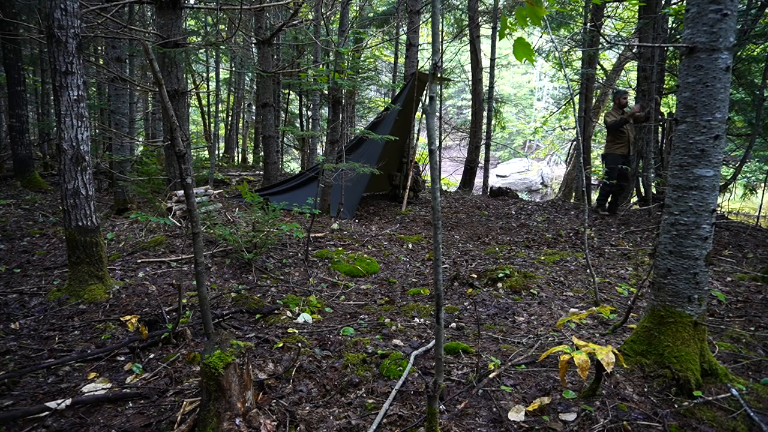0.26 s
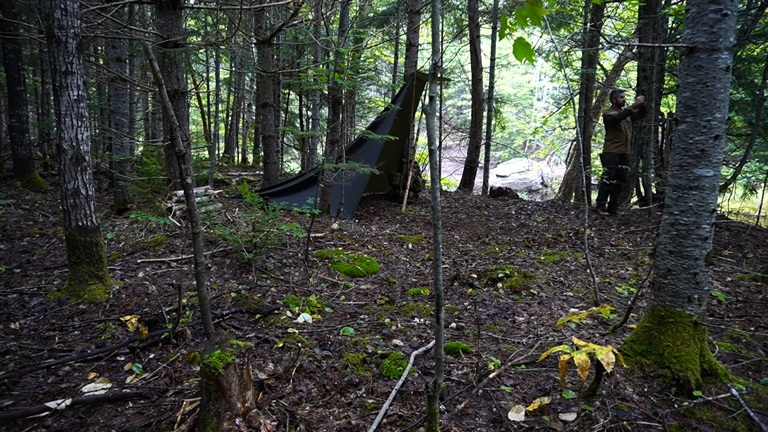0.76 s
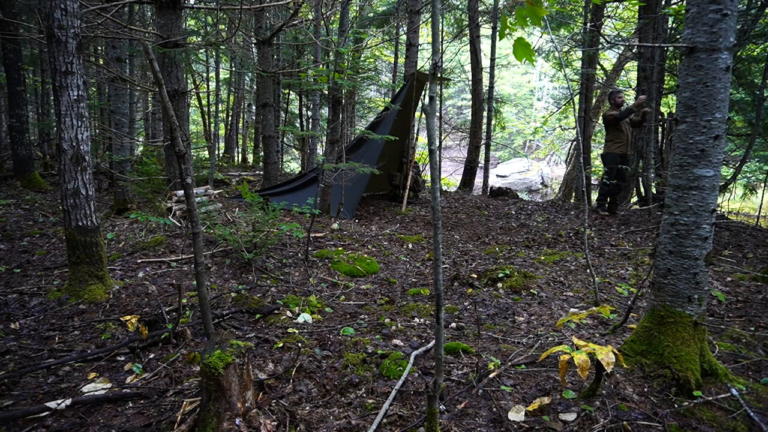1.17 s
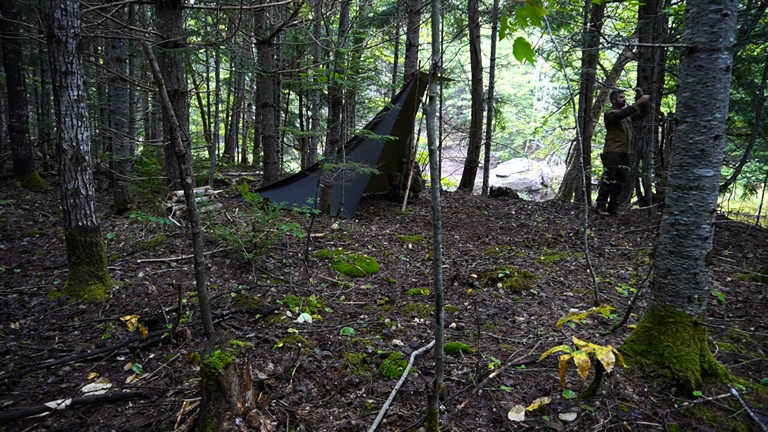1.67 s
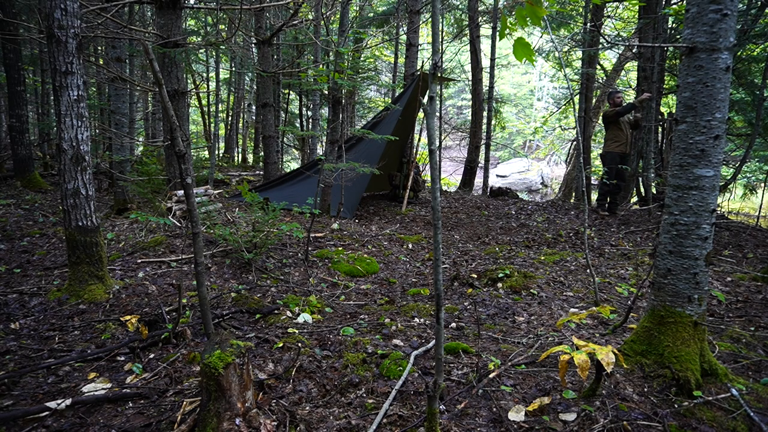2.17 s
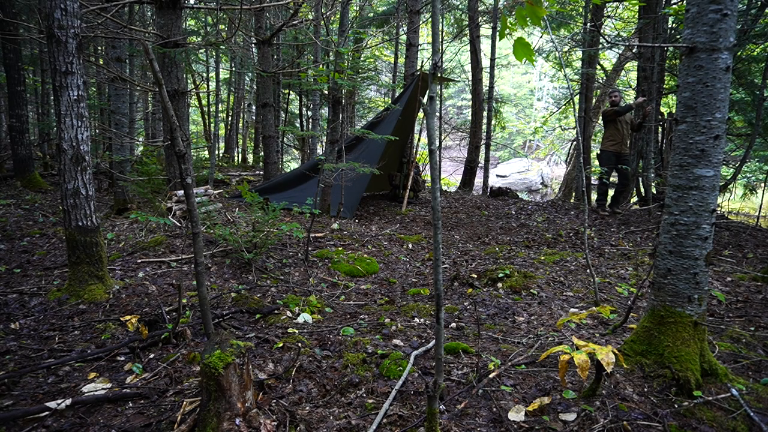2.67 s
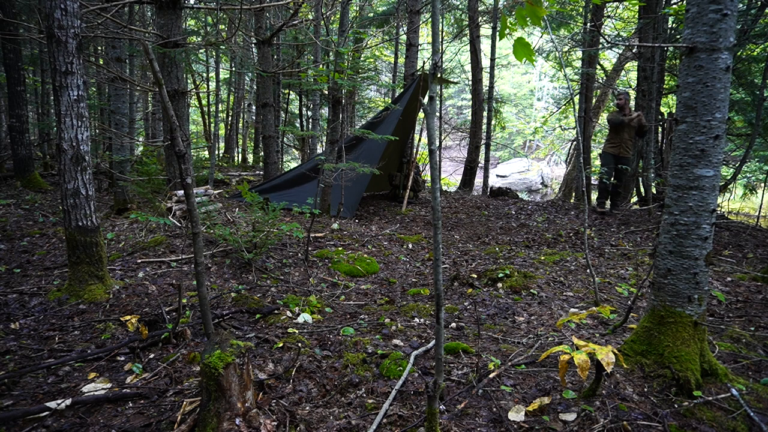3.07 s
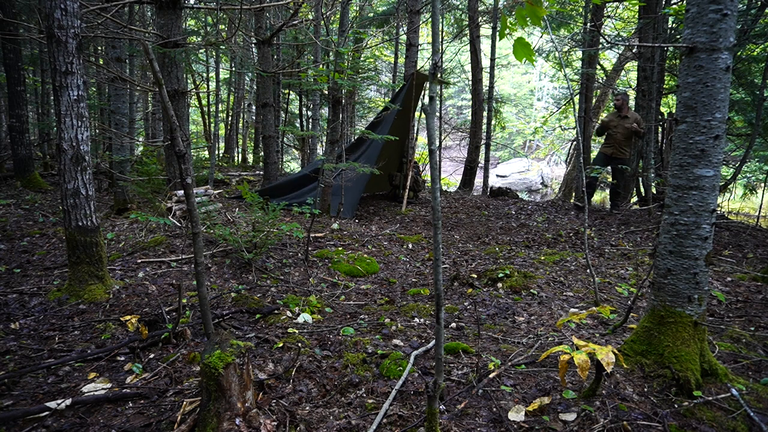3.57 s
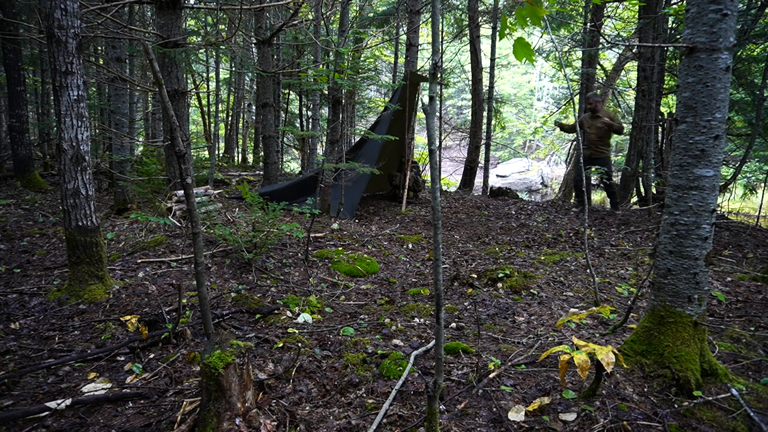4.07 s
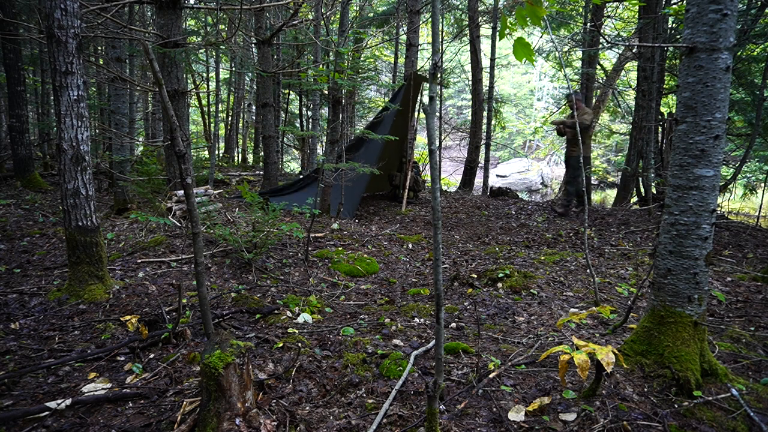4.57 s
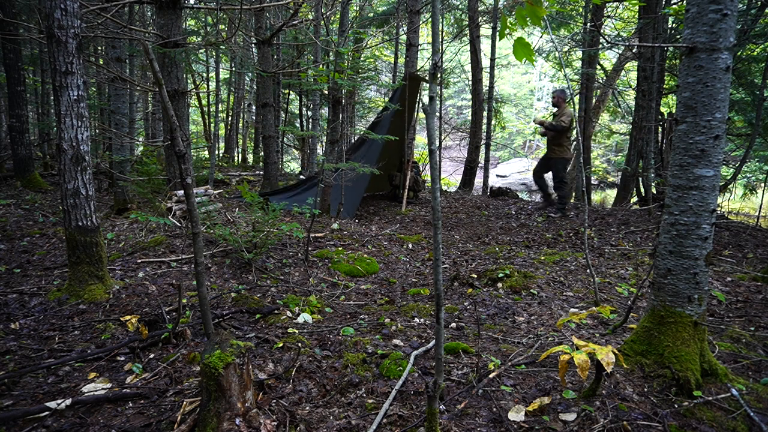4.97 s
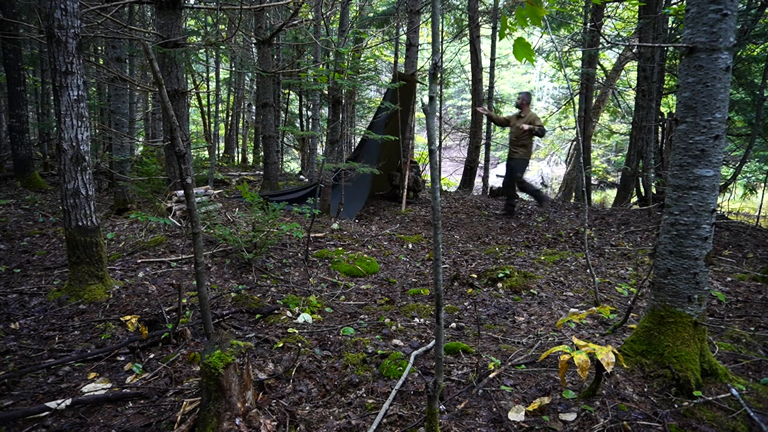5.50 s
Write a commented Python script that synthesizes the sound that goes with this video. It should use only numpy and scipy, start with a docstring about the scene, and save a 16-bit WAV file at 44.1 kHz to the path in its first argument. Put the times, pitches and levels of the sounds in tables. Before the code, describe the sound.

Close to the microphone, a heavy drop slaps a taut sheet almost at once, and another, fuller one follows after two seconds. Small ticks on leaves fill the gaps. A short leafy crackle comes just after the second hit, then a dull low thud, a leaf tap and a lighter drop. Faint steps in wet litter end it. Fine far drips and a soft stream lie behind, in open woodland.

```python
"""Forest camp after rain

Heavy drops thump a taut sheet close by, among a few dull low thuds; others tick on leaves around it. Each hit is
a contact click and a burst of noise, coloured by resonances; on the sheet, decaying modes join in.
A man steps through wet litter some way off: fading clusters of snaps. Behind lie the fine patter of far drips,
made of tiny random impacts, and the faint rush of a stream, made of shaped noise."""
import sys
import numpy as np
from scipy import signal
from scipy.fft import rfft, irfft
from scipy.io import wavfile
from scipy.ndimage import uniform_filter1d

SR = 44100
rng = np.random.default_rng(int(sys.argv[2]) if len(sys.argv) > 2 else 0)


def to_wav(sig):
    """Store sig (one row per channel, or 1-D mono) as 16-bit WAV at the path in sys.argv[1].

    Samples outside -1..1 are clipped; the rate is SR.
    """
    pcm = np.clip(np.atleast_2d(sig), -1, 1) * 32767
    pcm = np.round(pcm).astype(np.int16)
    wavfile.write(sys.argv[1], SR, pcm.T)  # frames by channels


N = 253134  # samples


def undb(db):
    """Decibels to amplitude gain."""
    return 10 ** (np.asarray(db) / 20)


def level(x, db):
    """Set the rms level."""
    return x * undb(db) / np.sqrt(np.mean(x ** 2))


def burst(x, db, span_s=.005):
    """Give a short sound the energy of span_s seconds at this rms level."""
    return x * undb(db) * np.sqrt(span_s * SR / np.sum(x ** 2))


def filt(x, hz, kind, order=2):
    """Causal Butterworth low-, high- or band-pass."""
    return signal.sosfilt(signal.butter(order, hz, kind, fs=SR, output="sos"), x)


def add(out, start_s, x):
    """Mix a sound in at its start time, cut at the end of the scene."""
    i = max(int(start_s * SR), 0)
    out[i:i + len(x)] += x[:max(len(out) - i, 0)]


def walk(rate_hz):
    """Slow random wander: normal knots at this rate, joined by straight lines."""
    knots = rng.standard_normal(256)
    return 1.03 * np.interp(np.arange(N) / SR * rate_hz, np.arange(len(knots)), knots)


def clicks(size, rate_hz, spread_db):
    """Random tiny impacts of either sign, a few much stronger than the rest."""
    chance = rng.random(size)
    sign = rng.choice([-1, 1], size)
    strength = rng.exponential(size=size)
    return (chance < rate_hz / SR) * sign * undb(spread_db * np.minimum(strength, 4))


def causal(gain):
    """Minimum-phase response with this gain, by folding the cepstrum: it rings only after the blow."""
    cepstrum = irfft(np.log(gain))
    cepstrum[1:len(gain) - 1] *= 2
    cepstrum[len(gain):] = 0
    return np.exp(rfft(cepstrum))


def far_drips():
    """Many small drips through the wood, on leaves of different sizes, blurred by the trunks."""
    # Each row: time in seconds, level in dB; interpolated.
    patter = [(0.0, -66.5), (0.25, -71), (0.88, -66.5), (1.18, -70.5), (4.33, -69.5), (4.8, -67.5),
              (5.39, -70), (5.74, -69)]
    out = 0
    t = np.arange(SR // 30) / SR
    for hz, band_db in [(1800, 1.5), (3200, 3.5), (5800, 0), (9500, -5.0)]:
        tail = 0.077 * rng.standard_normal(len(t)) * np.exp(-t / 0.0054)
        scatter = signal.unit_impulse(len(t)) + tail
        drips = signal.fftconvolve(clicks(N, rate_hz=130, spread_db=3.5), scatter)[:N]
        out = out + level(filt(drips, (hz * 0.79, hz * 1.35), "band"), band_db)
    contour_db = np.interp(np.arange(N) / SR, *np.transpose(patter))
    return level(out, 0) * undb(contour_db)


def stream():
    """A distant, even rush of shaped noise whose octave bands flicker a little, partly together."""
    # Each row: frequency in Hz, relative spectral density in dB.
    spectrum = [(12, -13), (20, 4.5), (38, -4), (55, -2.5), (81, -4), (104, -5.5), (168, -7.5), (216, -8),
                (301, -10.5), (337, -10.5), (1030, -9), (1960, -15.5), (6720, -24.5), (14700, -34),
                (16000, -33.5)]
    octave = np.log2(np.maximum(np.fft.rfftfreq(N, 1 / SR), 1))
    hz, density_db = np.transpose(spectrum)
    rush = rfft(rng.standard_normal(N)) * undb(np.interp(octave, np.log2(hz), density_db))
    out = 0
    swell = walk(2.37)  # shared by all bands
    for centre in np.arange(4, 15):  # log2 of Hz
        band = irfft(rush * np.maximum(1 - abs(octave - centre), 0), N)
        out = out + band * undb(0.33 * swell + 0.63 * walk(9.1))
    return level(out, -60)


def splash(slap_db, tick_db, tick_hz, spray_db, mist_db, rebound_ms, rebound_share, tick_width_hz):
    """One sharp contact, then a burst of noise as of droplets; the struck spot adds broad resonances."""
    splatter_ms, slap_share = 0.77, 0.29  # slap pitch as a share of the tick's
    spray_hz, mist_hz = 6250, 9860
    click_db = -21  # bare contact click under the resonances, relative to their mean power
    t = np.arange(2048) / SR
    decay = np.exp(-t * 1000 / splatter_ms) + 0.015 * np.exp(-t / 0.0042)
    droplets = rng.standard_normal(len(t)) * decay
    force = rfft(burst(signal.unit_impulse(len(t)), 0) + burst(droplets, 4.0))
    smooth_power = uniform_filter1d(abs(force) ** 2, size=17)
    force = force * causal(smooth_power ** -.5)  # about equally strong at all pitches
    f = np.fft.rfftfreq(len(t), 1 / SR)
    octave = np.log2(f + 1)
    tick_width_octaves = tick_width_hz / tick_hz / np.log(2)
    power = 0
    for db, hz, width_octaves in [(slap_db, slap_share * tick_hz, .5), (tick_db, tick_hz, tick_width_octaves),
                                  (spray_db, spray_hz, .3), (mist_db, mist_hz, .25)]:
        hump = np.exp(-((octave - np.log2(hz)) / width_octaves) ** 2)
        power = power + undb(db) ** 2 * hump / hump.sum()
    # the struck spot snaps back a moment later: two clicks that cancel at some pitches
    ripple = np.exp(-f / 9000) * np.cos(2 * np.pi * f * rebound_ms / 1000)
    power = power * (1 + rebound_share * ripple)
    click_power = undb(click_db) ** 2 * power.mean() / (1 + (f / 4000) ** 2)
    colour = causal(np.sqrt(power + click_power))
    return burst(irfft(force * colour), 10 * np.log10(power.sum()))


def thump(db, low_hz, soft_hz, contact_ms, echo_share):
    """A blow pushes the sheet into its modes; a soft one spares the high modes, one near the edge the low."""
    # Modes of the sheet. Each row: frequency in Hz, relative level in dB, t60 in seconds.
    sheet_modes = [(37, -7.5, 0.44), (61, 0, 0.18), (91.3, -5, 0.14), (121.4, 3.5, 0.08), (192.6, -4, 0.08),
                   (253, -5, 0.06), (339, 7, 0.035), (378, -8, 0.062), (484, 13, 0.02), (665, 12, 0.015)]
    edge_echo_ms = 4.54
    t = np.arange(SR // 2) / SR
    hz, mode_db, t60_s = np.transpose(sheet_modes)[:, :, None]
    detune, spot = rng.standard_normal((2, len(hz), 1))  # small differences from blow to blow
    modes = undb(mode_db + 0.13 * spot) * np.sin(2 * np.pi * hz * (1 + 0.011 * detune) * t)
    swing = np.sum(modes * np.exp(-np.log(1000) * t / t60_s), axis=0)
    push = np.clip((contact_ms / 1000 - t) * SR, 0, 1)
    push = push * np.exp(-.45 * t * 1000 / contact_ms)  # the force eases during contact
    swing = signal.fftconvolve(swing, push)[:len(t)]  # weakens modes whose period equals the contact
    # the ripple comes back duller from the nearest edge
    returning = np.interp(t - edge_echo_ms / 1000, t, filt(swing, 400, "low", order=1), left=0)
    swing = swing + echo_share * returning
    return burst(filt(filt(swing, soft_hz, "low"), low_hz, "high"), db, span_s=.02)


def sheet_hits():
    """Drops splash and set the sheet swinging; a few dull low thuds, perhaps footfalls or the sheet flapping,
    are played the same way."""
    # Each row: start in seconds, thump level in dB, thump high-pass corner in Hz, softness low-pass corner in Hz,
    # contact in ms, signed edge echo share, slap level in dB, tick level in dB, tick pitch in Hz,
    # spray level in dB, mist level in dB, rebound delay in ms.
    hits = [(0.0295, -48.5, 71, 1000, 2.55, 0.33, -50, -57.5, 3050, -57.5, -60, .2),
            (0.1108, -23.5, 93, 470, 2, 0.24, -30.5, -25.5, 2950, -31.5, -37.5, 0.84),
            (2.2718, -23.5, 105, 1090, 2.2, -0.3, -22.5, -25.5, 2000, -45, -50, .57),
            (3.4439, -27, 180, 338, 2.43, -0.26, -47.5, -78, 3500, -84, -83, 0.59),
            (3.606, -52.5, 30.2, 100, 7.8, .7, -65, -71, 3300, -84, -82, 0.89),
            (3.942, -53, 154, 170, 1.2, 0.1, -68, -64, 3500, -72, -75, .9),
            (3.9798, -39.5, 142, 453, 2.14, -0.04, -52, -80, 2800, -82, -83, 1),
            (4.09, -50, 39, 130, 2.9, -0.9, -58.5, -66, 3500, -74, -81, 1.4),
            (4.706, -37, 247, 640, 2.6, 0.42, -37.5, -38, 2090, -50, -55.5, 0.81),
            (4.97, -54.5, 36, 400, 0.68, .6, -56, -62, 2000, -76, -82, 0.31),
            (5.1413, -55.5, 67, 400, 1, 0.1, -52.5, -48, 3900, -54, -55, 0.53),
            (5.164, -48, 163, 1050, 2.3, -.65, -49, -54, 2620, -63, -69, 0.17),
            (5.6325, -52, 175, 350, 1.7, 0.05, -55, -57, 3120, -64, -59.5, 0.32)]
    out = np.zeros(N)
    for start_s, db, low_hz, soft_hz, contact_ms, echo_share, *contact in hits:
        add(out, start_s, splash(*contact, rebound_share=0.86, tick_width_hz=1060))
        add(out, start_s, -thump(db, low_hz, soft_hz, contact_ms, echo_share))
    return out


def leaf_drops():
    """Drops on leaves tick without a thump; a stiff leaf rings in a narrower band."""
    # Each row: start in seconds, slap level in dB, tick level in dB, tick pitch in Hz, spray level in dB,
    # mist level in dB, tick width in Hz.
    drops = [(1.0236, -74, -78, 3000, -56.5, -76, 800), (1.4583, -55.5, -48, 2460, -54.5, -55.5, 420),
             (1.704, -68, -63, 3000, -56, -71, 700), (2.079, -44.5, -44, 2000, -46, -59, 950),
             (2.2385, -56, -59, 1700, -79, -85, 500), (2.4347, -51, -56, 2600, -57, -64, 1300),
             (2.8709, -61, -59.5, 2250, -69, -68, 350), (2.906, -55, -79, 3100, -81, -80, 500),
             (3.1058, -65, -64, 2340, -60, -72, 350), (3.7993, -68, -53.5, 1580, -61, -74, 730),
             (4.2296, -36, -37.5, 2800, -49, -81, 620), (4.3275, -55, -46, 1500, -66, -71, 815),
             (5.7166, -59, -56.5, 3100, -65, -78, 560)]
    out = np.zeros(N)
    for start_s, *wet, width_hz in drops:
        add(out, start_s, splash(*wet, rebound_ms=0.716, rebound_share=0.34, tick_width_hz=width_hz))
    return out


def footsteps():
    """Each tread snaps a fading cluster of leaf ribs and twigs over a duller crush."""
    # Each row: start in seconds, level in dB, fade time constant in seconds, crush level in dB re the step.
    steps = [(2.4455, -44.5, 0.0052, 1.5), (2.508, -57.5, 0.0051, -3), (4.5724, -50, .01, -7.5),
             (5.003, -59.5, 0.021, 2), (5.262, -60, 0.0082, -14), (5.46, -63, .056, 0.5)]
    out = np.zeros(N)
    t = np.arange(SR // 4) / SR
    for start_s, db, fade_s, crush_db in steps:
        snaps = clicks(len(t), rate_hz=3200, spread_db=4.5) * np.exp(-t / fade_s)
        for band_hz, part_db in [((700, 1250), crush_db), ((2100, 3900), -1), ((4500, 10500), -5.5)]:
            add(out, start_s, burst(filt(snaps, band_hz, "band"), db + part_db, span_s=fade_s / 2))
    return out


def scene():
    """Sheet, leaves, steps and the wood behind them, in one channel."""
    return (far_drips() + stream() + sheet_hits() + leaf_drops() + footsteps())[None]


def record(dry):
    """A steep elliptic low-pass cuts the top."""
    top_hz = 15900
    return signal.sosfilt(signal.ellip(8, .2, 70, top_hz, fs=SR, output="sos"), dry)


dry = scene()
out = record(dry)
to_wav(out)
```